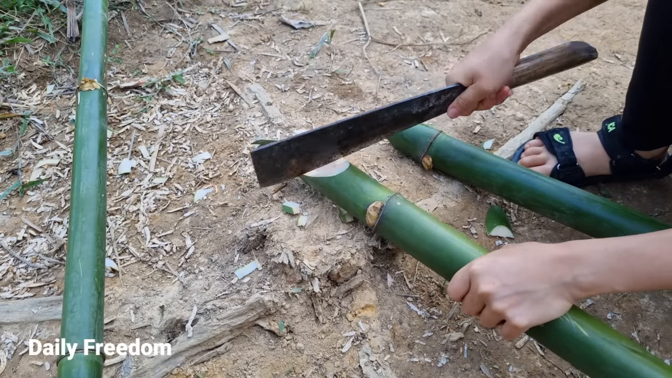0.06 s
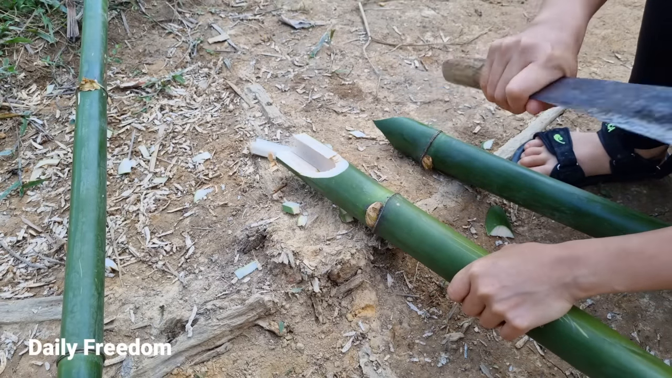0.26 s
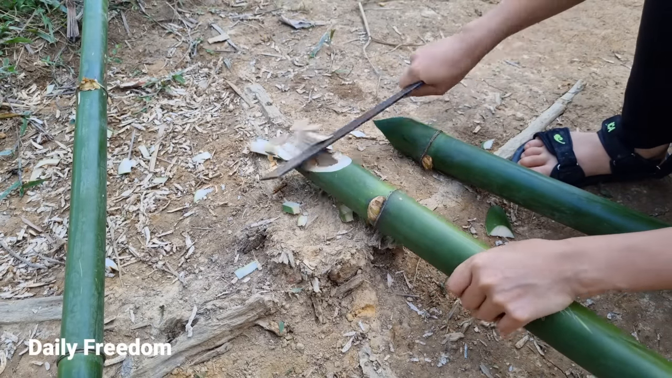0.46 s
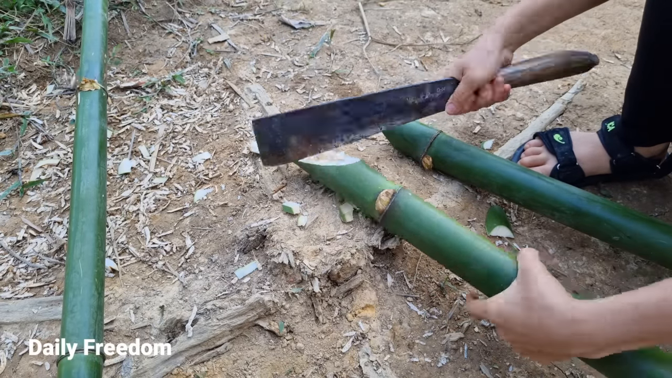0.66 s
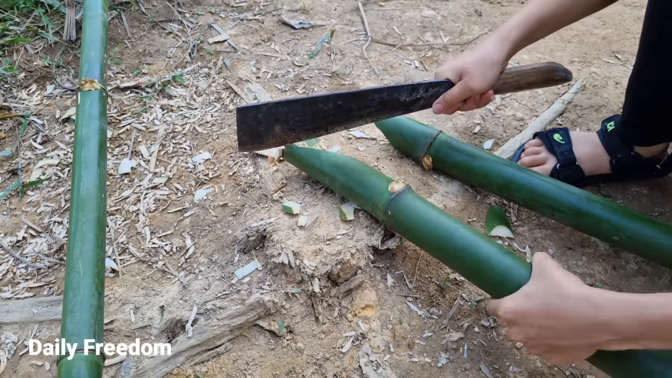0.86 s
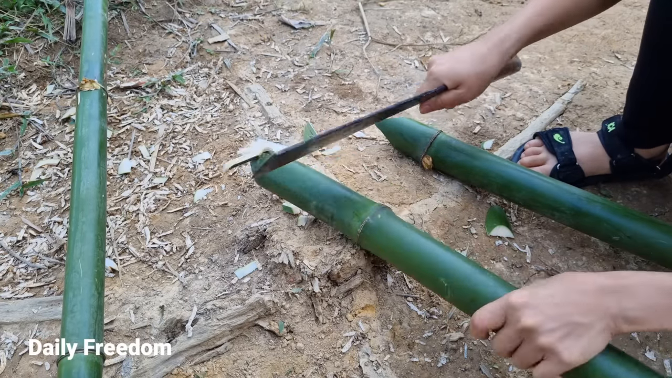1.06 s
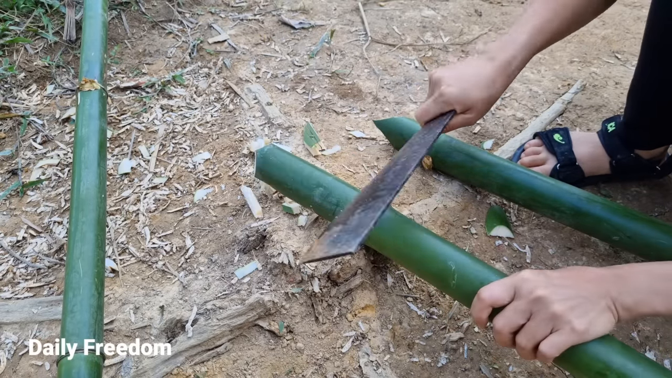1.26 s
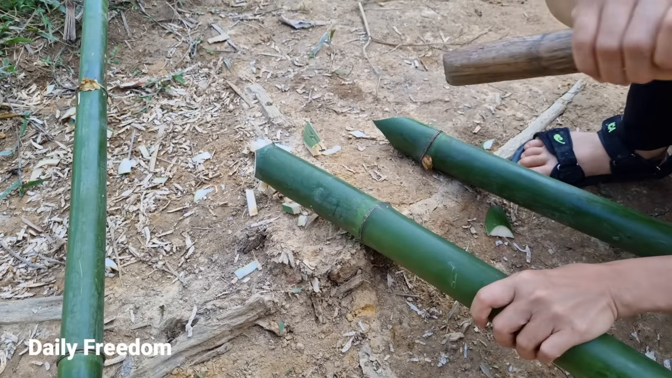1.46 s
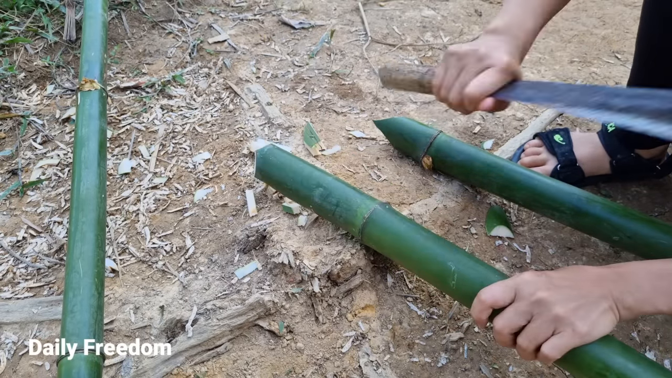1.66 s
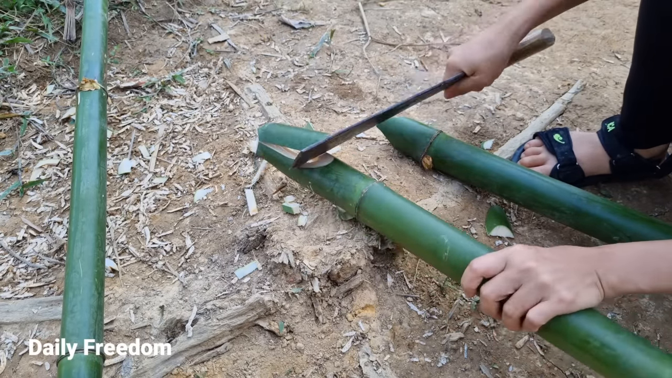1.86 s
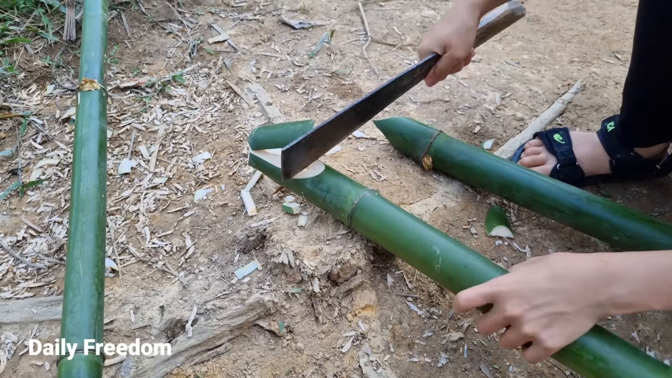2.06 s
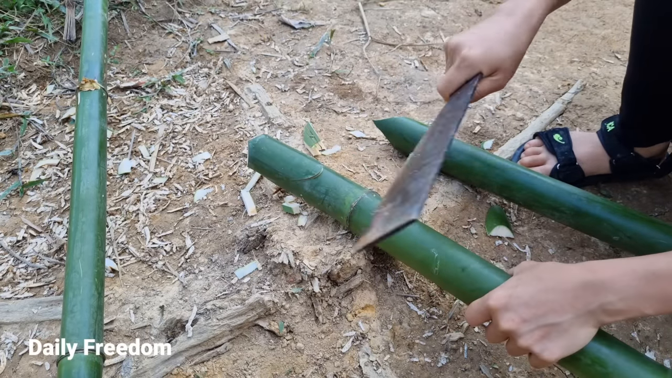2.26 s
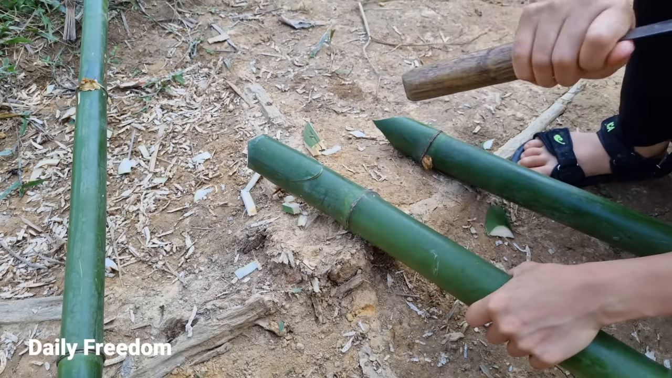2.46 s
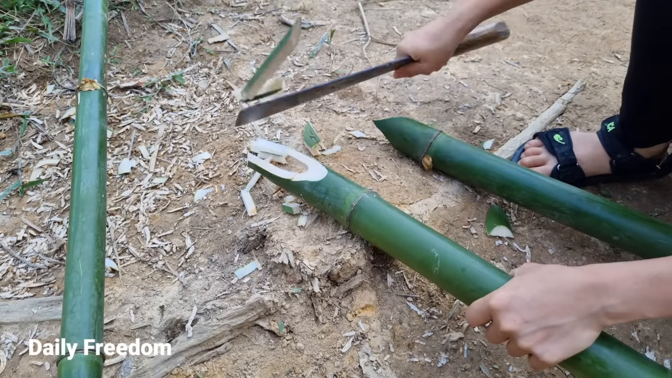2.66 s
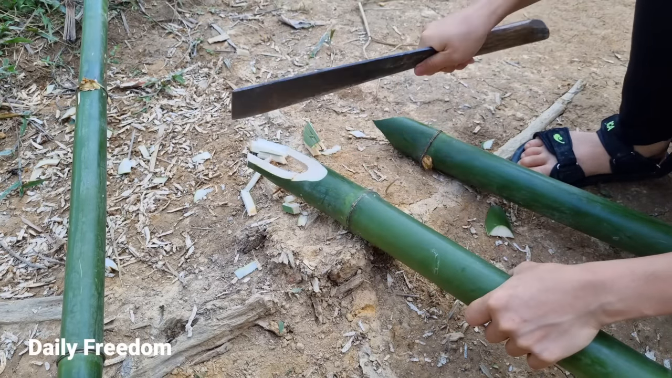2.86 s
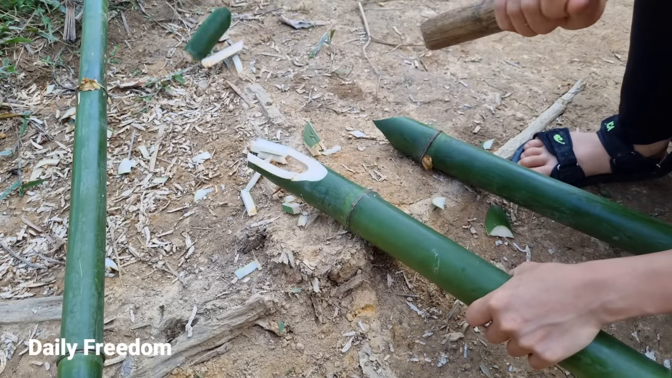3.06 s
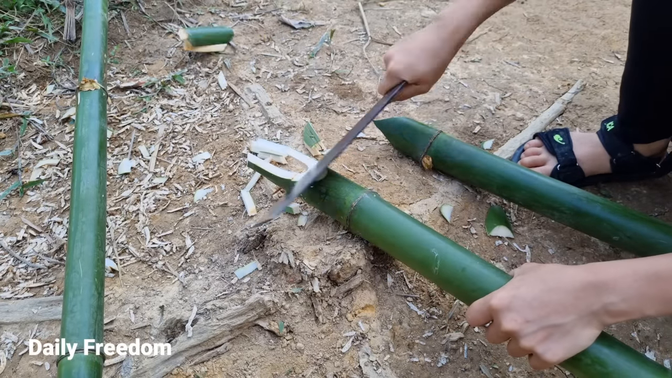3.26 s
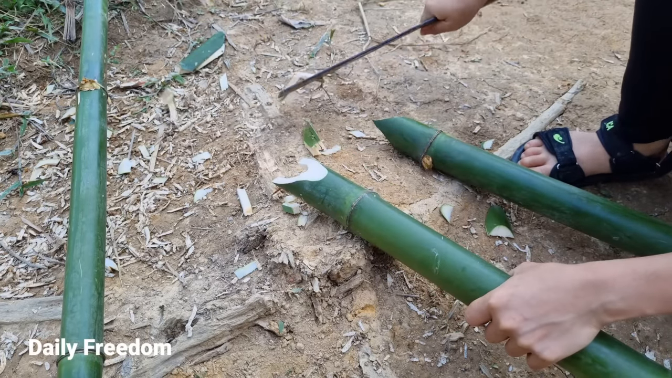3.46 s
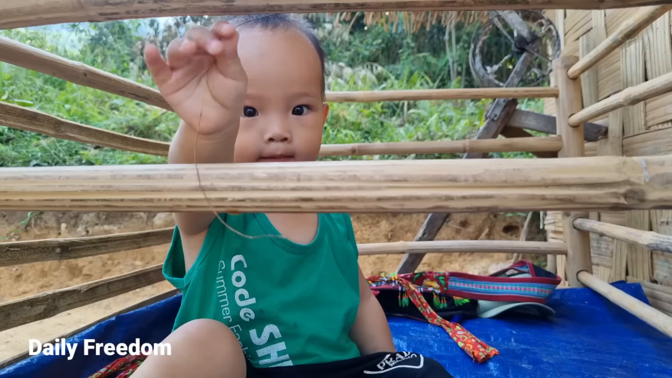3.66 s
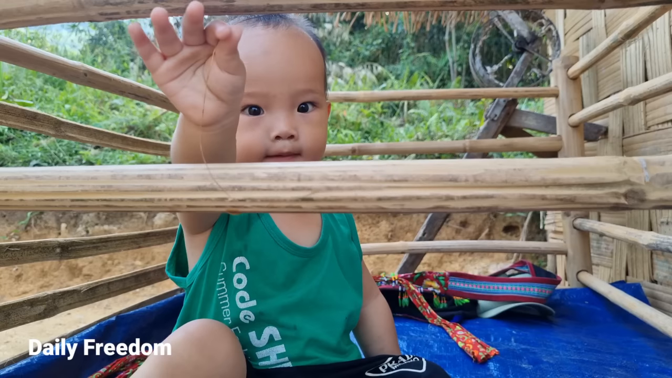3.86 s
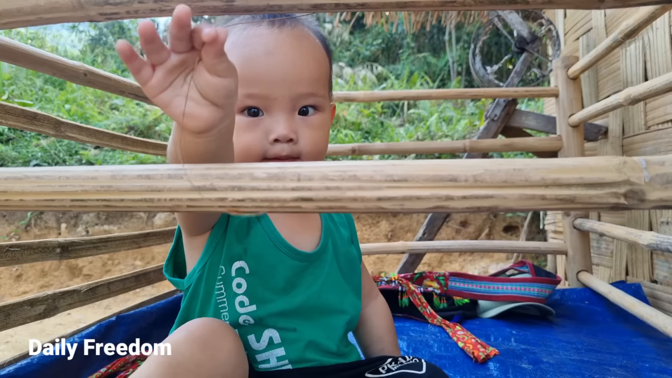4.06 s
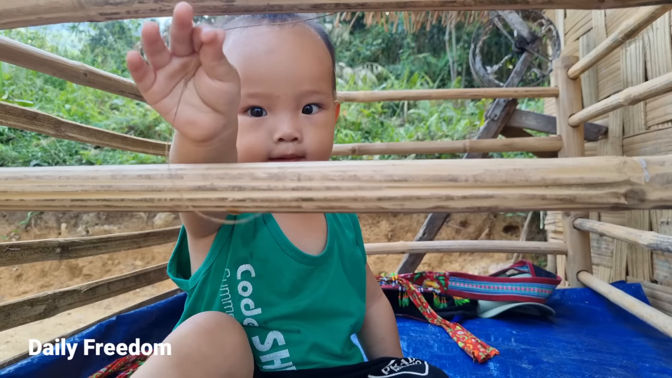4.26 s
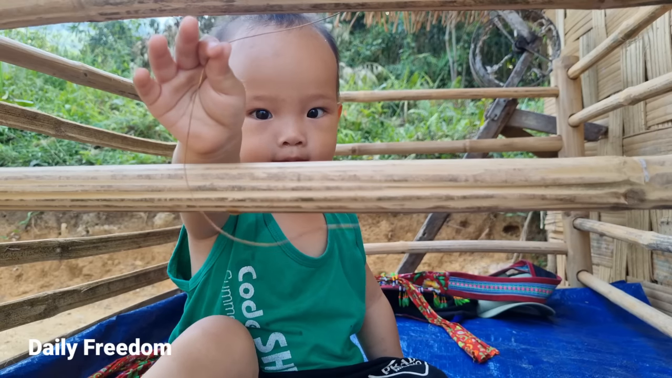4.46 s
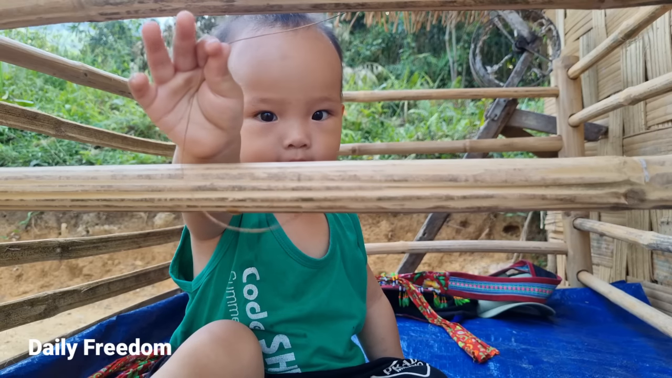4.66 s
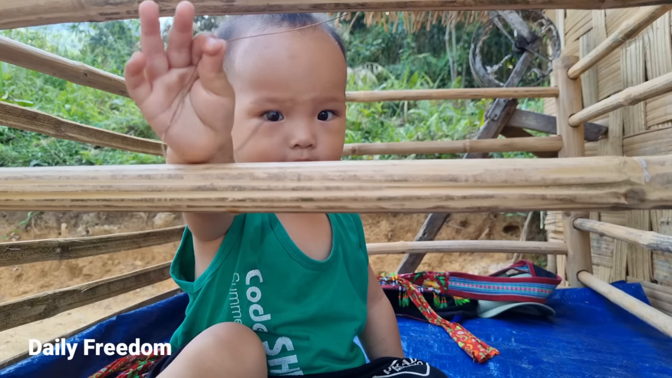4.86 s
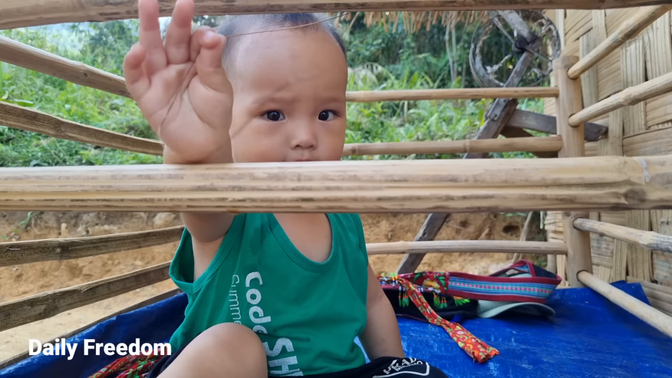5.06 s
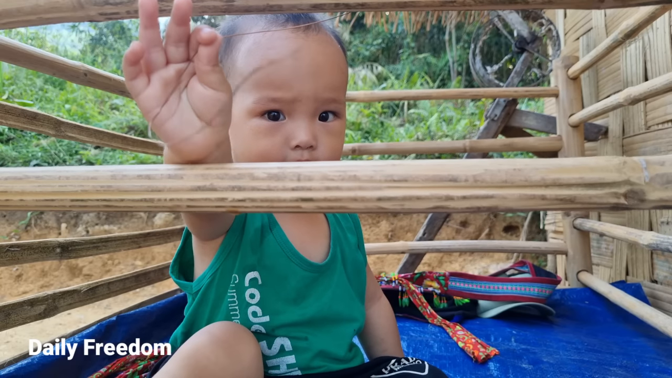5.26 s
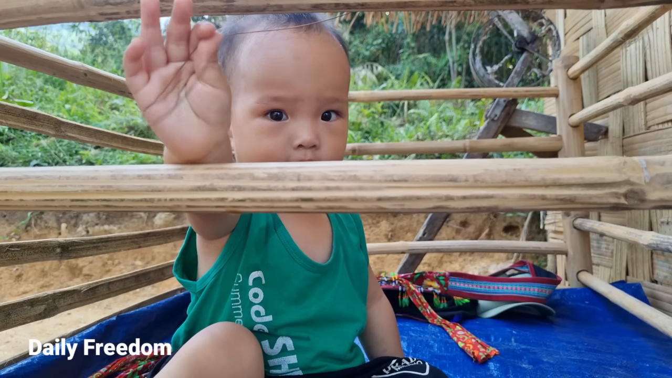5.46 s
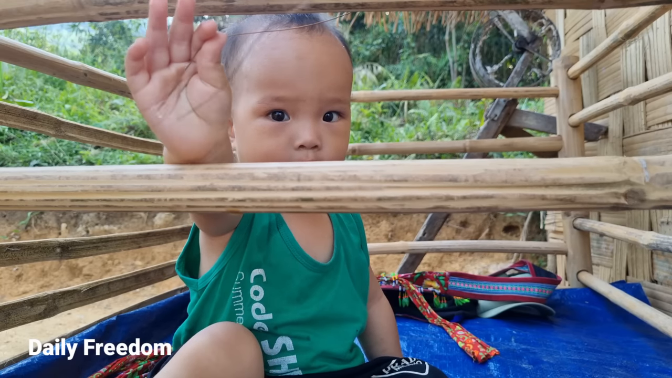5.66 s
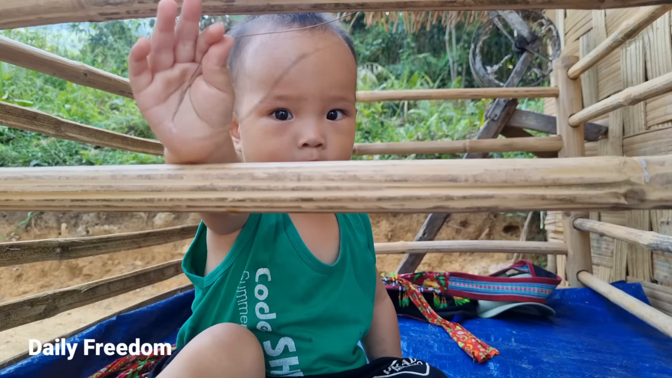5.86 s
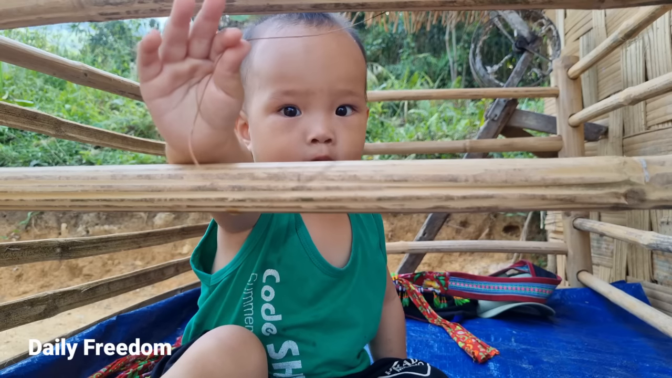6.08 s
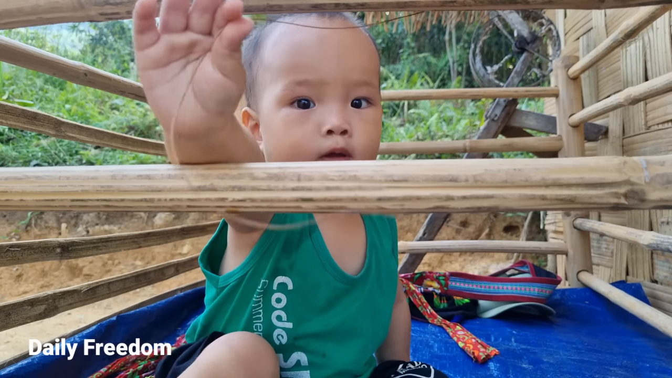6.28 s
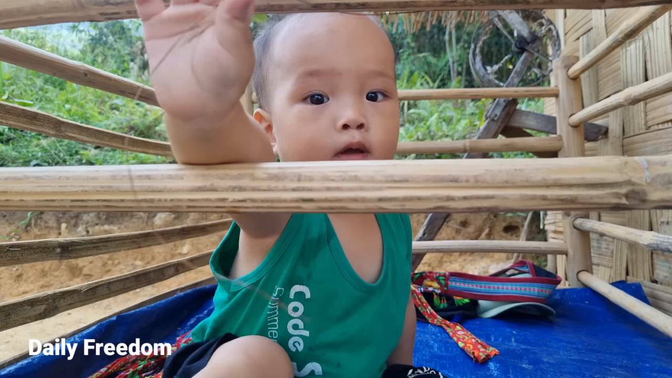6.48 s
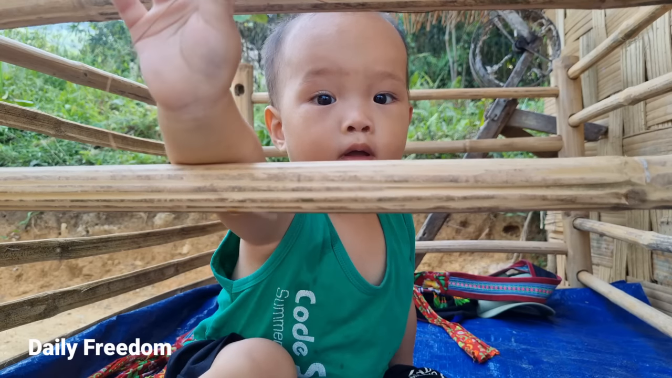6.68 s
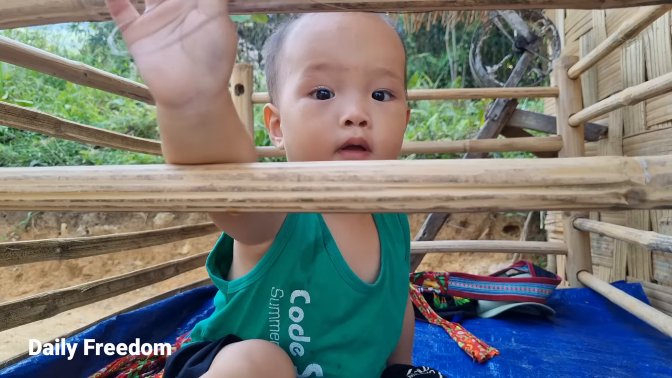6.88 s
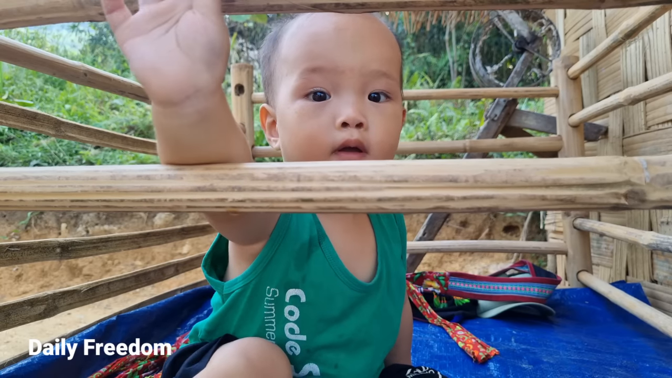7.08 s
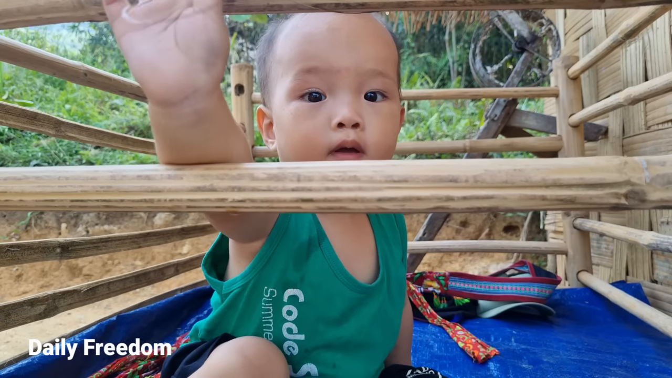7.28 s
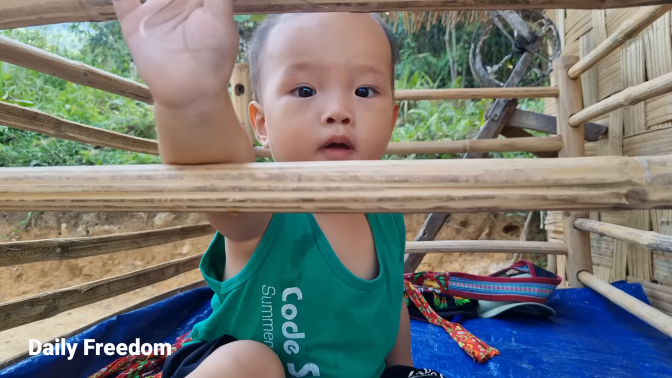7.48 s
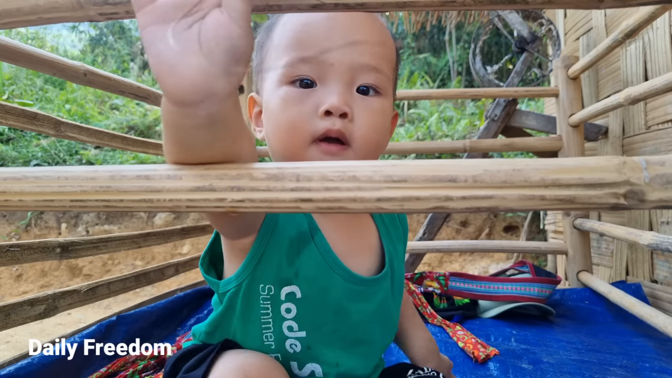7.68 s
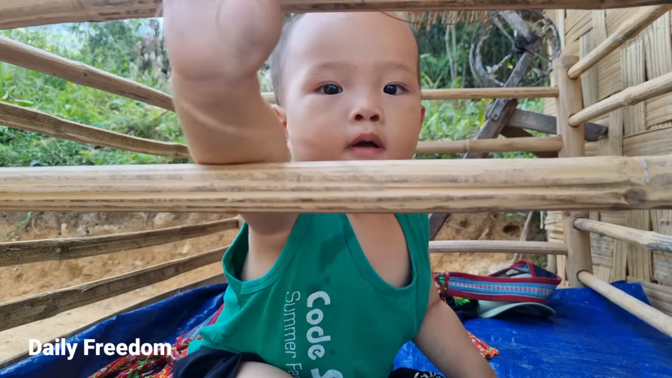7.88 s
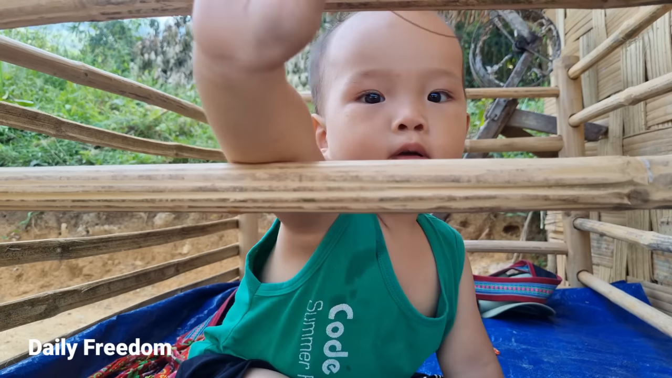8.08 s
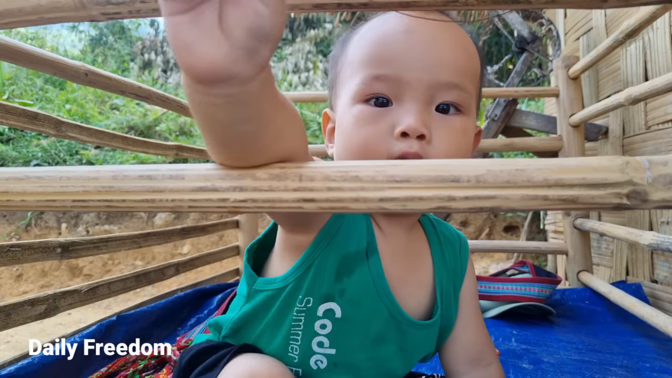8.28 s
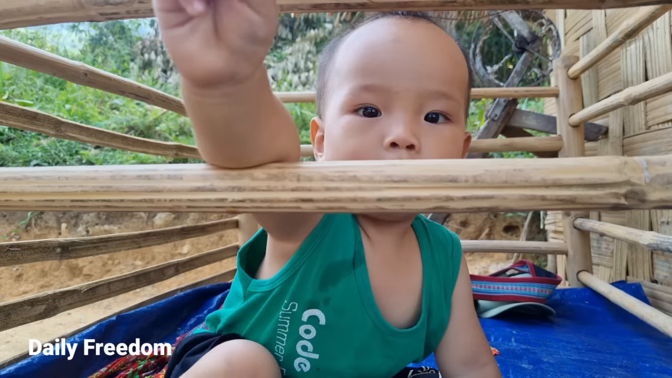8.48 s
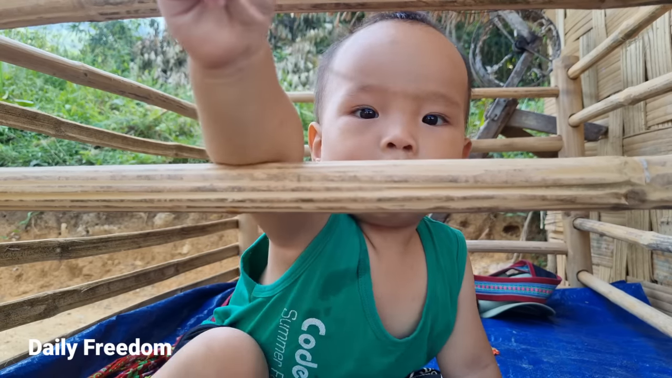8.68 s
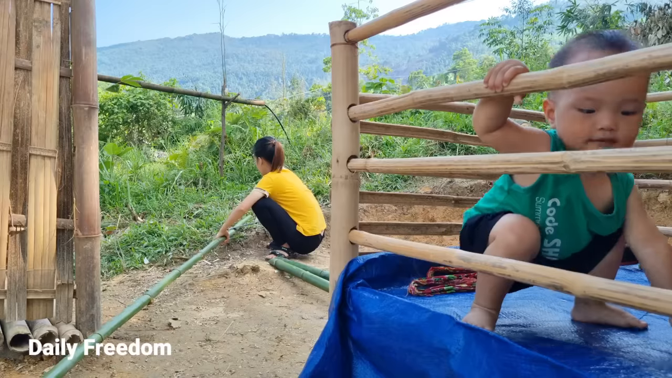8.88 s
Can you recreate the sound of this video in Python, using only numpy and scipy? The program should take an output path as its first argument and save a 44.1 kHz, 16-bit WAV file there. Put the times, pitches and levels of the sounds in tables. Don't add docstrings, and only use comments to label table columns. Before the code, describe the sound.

Close, woody chops split bamboo outdoors; chips patter, poles knock and snap, one drops loudly, with crickets, cicadas and a faint far engine behind.

```python
import sys
import numpy as np
from scipy import signal
from scipy.fft import rfft, irfft, next_fast_len
from scipy.io import wavfile
from scipy.ndimage import uniform_filter1d

SR = 44100
rng = np.random.default_rng(int(sys.argv[2]) if len(sys.argv) > 2 else 0)


def wav_out(sig):
    wavfile.write(sys.argv[1], SR, np.round(np.clip(np.atleast_2d(sig).T, -1, 1) * 32767).astype(np.int16))


def to_linear_factor(level_db):
    exponent = np.asarray(level_db, float) / 20
    return 10 ** exponent


N = 393813

# pitch_hz, level_db_per_hz
FIELD_SPECTRUM = [(90, -5), (200, -6.5), (500, -7), (1000, -30.5), (1650, -5), (2300, -10.5), (4200, -3),
                  (6600, -5.5), (7900, -3), (9500, -8), (11500, -9.5), (13000, -32), (15700, 2),
                  (16300, -35.5)]
WIND_SPECTRUM = [(13, -32.5), (25, -20), (38, 0), (70, 10.5), (176, -16.5), (237, -5), (361, -44),
                 (500, -11), (650, -35), (1100, -120)]
LITTER_SPECTRUM = [(150, -23), (250, -10), (439, -6), (535, 1.5), (1070, -2.5), (2330, -1), (3140, -1.5),
                   (7920, -2), (8740, -6.5), (13000, -6.5)]
CICADA_SPECTRUM = [(11500, -72), (12600, -6), (13800, 2.5), (14600, 8.5), (15500, 5.5), (15800, -44),
                   (16500, -72)]
FIELD_DB = -54.5
# time_s, level_db
WIND_LEVEL = [(.3, -69.5), (1.6, -63.5), (4.2, -56.5), (5.3, -66.5), (5.9, -59.5), (7.5, -58.5), (7.8, -48),
              (8.3, -61), (8.55, -44.5), (8.93, -59.5)]
CRICKET_LEVEL = [(.74, -66), (.8, -56), (1.15, -56.5), (1.24, -65), (1.66, -67), (1.74, -56.5),
                 (2.65, -56.5), (3.75, -61), (3.9, -63), (8.2, -61.5), (8.55, -70)]
CICADA_LEVEL = [(2.2, -55), (3.9, -52), (8.36, -51.5), (8.43, -50), (8.7, -57)]
# time_s, change_db
HUSH = [
    (8.4, -1),
    (8.5, -11),
    (8.93, -7),
]
# start_s, level_db, length_s
STIRS = [(0, -52.5, 0.067), (0.564, -55, 0.17), (1.426, -63, 0.52), (2.21, -52.5, 0.073),
         (3.824, -52, 0.066), (3.954, -64.5, 0.28), (6.242, -57, 0.21), (6.951, -54.5, 0.22),
         (7.717, -51.5, 0.25), (7.947, -58.5, 0.39), (8.6, -63, 0.35)]
STIR_RISE_S, STIR_FALL_DB_PER_S, STILL_DB = 0.053, 87.5, -62.5
# pitch_hz, likeness_0_to_1 (below 0 counts as 0)
AIR_LIKENESS = [(60, 0.8), (180, 0.8), (550, 0.26), (1650, -0.34), (4970, 0.21), (15000, 0)]
HIT_LIKENESS = [(100, 0.97), (300, 0.92), (560, 0.84), (900, 0.45), (1600, 0.43), (3000, 0.15),
                (12000, 0.15)]

# time_s, firing_rate_hz, level_db
ENGINE = [
    (1.6, 81.1, -65.5),
    (2.0, 81.9, -61),
    (3.45, 82.2, -67.5),
    (3.749, 47.8, -72),
    (5.852, 50.1, -68),
    (6.15, 75.8, -59),
    (7.3, 79.7, -58),
    (8.299, 67.54, -60),
    (8.93, 70.3, -62),
]
# multiple_of_firing_rate, level_db
ENGINE_ORDERS = [(2 / 3, -8), (1, 0), (2, -13)]

# start_s, peak_db, pitch_hz, left_minus_right_db
TAPS = [(0.133, -41, 1205, -1), (0.17, -31.5, 1800, -4), (0.225, -39, 1920, -4), (0.37, -28, 3690, 6),
        (.925, -40.5, 1820, 6), (1.333, -50, 910, 10), (1.469, -41, 4700, 3), (1.516, -39.5, 3980, 9),
        (1.61, -42, 1730, 8), (1.94, -38, 5070, 5), (4.941, -29.5, 3300, 3), (4.95, -38, 1480, 5),
        (8.736, -37.5, 4000, 1), (1.387, -43.5, 574, 3), (4.562, -48, 606, 6), (2.096, -43, 3400, 18),
        (2.971, -38, 1500, 6), (3.169, -28, 1450, 3), (8.797, -37, 2380, 3)]
TAP_CRACK_DB, TAP_T60_S = -23, 0.041
# start_s, peak_db, pitch_hz, t60_s
LANDINGS = [(0.083, -35, 2400, 0.15), (0.366, -33, 1410, 0.11), (0.652, -38.5, 2100, 0.11),
            (.68, -39.5, 910, .06), (1.424, -44.5, 616, 0.081), (5.003, -38.5, 517, 0.023),
            (6.31, -43, 1650, .04), (8.47, -29, 527, 0.11), (8.529, -35.5, 450, .1),
            (8.563, -38.5, 695, 0.11), (3.6, -53.5, 690, 0.15), (8.631, -39, 2400, 0.1),
            (8.846, -38, 2460, 0.12), (0.758, -37.5, 2590, 0.075), (1.152, -39, 1550, 0.065),
            (1.153, -40.5, 790, 0.13), (1.928, -38.5, 800, 0.0095), (2.814, -31.5, 560, 0.035),
            (3.153, -28.5, 950, 0.026), (3.167, -27.5, 685, 0.019), (3.57, -40, 1100, 0.066),
            (3.971, -44, 660, 0.057), (5.336, -42.5, 211, 0.076), (7.99, -30.5, 256, 0.081),
            (5.347, -45, 1500, 0.035), (5.662, -51, 910, .05), (6.399, -47, 900, 0.028)]
LANDING_CRACK_DB, LANDING_PAN_DB = -1.5, 0
# start_s, crack_db, pitch_hz, left_minus_right_db
TWIGS = [(0.116, -38, 1900, -8), (3.502, -35, 1690, 1), (4.154, -33.5, 550, 2), (4.927, -37, 261, 1),
         (5.04, -20.5, 1490, -2.5), (5.969, -22, 1520, -7), (2.728, -31, 6500, -4), (6.43, -36, 1600, -11),
         (7.366, -37, 2000, 1), (7.545, -38, 268, 7), (7.979, -31, 226, -14)]
TWIG_TONE_DB, TWIG_T60_S = -17, 0.024
# start_s, level_db, pitch_hz, length_s
CLUCKS = [(0.154, -46, 298, 0.014), (2.013, -60.5, 421, 0.08), (3.684, -54.5, 367, 0.036),
          (3.775, -57, 1760, 0.041), (4.065, -63, 1820, 0.039), (4.276, -62, 1705, 0.042),
          (3.883, -59, 552, 0.059), (4.062, -62, 532, 0.1), (4.542, -57.5, 1790, 0.038),
          (4.724, -60, 1740, 0.05), (4.724, -63, 1530, .055), (4.639, -62.5, 412, 0.083),
          (4.975, -57.5, 570, 0.032), (0.934, -65, 1796, 0.13), (.94, -61, 482, 0.1),
          (1.07, -64, 450, 0.064), (5.69, -65, 800, .06), (5.69, -61, 380, .045), (6.015, -62, 1770, .045),
          (6.015, -63, 1570, .23), (6.13, -60, 1800, 0.055), (6.239, -59.5, 1730, .05),
          (6.61, -65, 545, 0.047), (6.71, -65, 543, 0.027), (6.692, -65, 860, 0.032),
          (6.694, -61, 2150, .04), (6.695, -63.5, 1630, .075), (7.7, -55, 1600, 0.066),
          (7.79, -59, 1600, .17)]

# start_s, peak_db, crack_db, rise_s, t60_s
BLOWS = [
    [(.5272, -7, -9, 0.00057, 0.07), (.531, -11.5, -5.5, 0.0023, 0.03), (.539, -16, -31, 0.0014, 0.078),
     (.556, -35, -26.5, .004, 0.22)],
    [(1.794, -5, -1.5, 0.00037, 0.025), (1.7985, -7, -12, 0.00086, 0.052),
     (1.807, -12.5, -15.5, 0.0017, 0.081), (1.829, -24, -22, 0.0031, 0.12)],
    [(2.6752, -3, -6.5, 0.00043, 0.018), (2.682, -9, -6, 0.0013, 0.034),
     (2.688, -11, -11.5, 0.00087, 0.055)],
    [(3.352, -10.5, -4, 0.0022, 0.047), (3.364, -13, -14, 0.0046, 0.044), (3.376, -21, -12.5, 0.005, 0.043),
     (3.386, -17, -14.5, 0.0036, 0.036), (3.430, -33.5, -35, 0.0023, 0.11)],
]
# start_s, peak_db, crack_db, t60_s
KNOCKS = [
    [(5.757, -12, -36, 0.067), (5.762, -15.5, -28, 0.093), (5.769, -20, -29, 0.19)],
    [(7.008, -30, -25, 0.079), (7.018, -20.5, -18, 0.12), (7.0695, -11, -4, 0.077),
     (7.075, -17, -10, 0.068), (7.143, -25, -20, 0.089), (7.149, -33, -14.5, 0.086)],
    [(8.407, -28, -18, 0.04), (8.412, -3, -12, 0.097), (8.424, -10, -13.5, 0.16), (8.482, -36, -21, 0.16),
     (8.45, -37, -23, 0.22), (8.513, -24.5, -21.5, 0.17), (8.558, -34, -28, 0.095),
     (8.625, -39.5, -57, 0.68)],
]
KNOCK_RISE_S = 0.00056
SOFT_SHARE = 0.25
# pitch_hz, level_db_per_hz
POLE_WALLS = [
    [(250, -17), (572, -17.5), (833, 1.5), (1100, -19), (1810, -2.5), (5000, -15)],
    [(250, -24), (699, -9), (865, 2.5), (1260, -4), (2300, -2), (5000, -11)],
    [(250, -31.5), (720, -12.5), (900, 5.5), (1240, -10), (2390, -7.5), (5000, -13)],
    [(250, -8), (342, -39), (720, -9), (1230, -5), (1930, -5), (5000, -20.5)],
    [(250, -21), (408, -1), (565, -9), (772, 0), (1560, -6), (5000, -23.5)],
    [(250, -50), (632, -19), (1080, -5), (1340, -6.5), (2480, -1.5), (5000, -7.5)],
    [(250, -17), (413, -16), (1080, 3.5), (2000, -5), (2800, -2), (3300, -10.5), (4700, -8)],
]
# pitch_hz, level_db_per_hz
LOW_SKIRT = [(150, -33.5)]
HIGH_SKIRT = [(6500, -30.5), (11000, -120)]
# pitch_hz, height_db_per_hz, t60_s
POLE_MODES = [
    [(837, -3, 0.086), (1640, -3, 0.067), (1820, 0, 0.058), (2350, 0, .04), (2708, -20, 0.067),
     (4100, -6, 0.064)],
    [(870, -4, 0.029), (1600, -1, 0.11), (1920, 6.5, 0.039), (2350, 6, 0.09), (3450, -9, .06),
     (4650, -7, 0.055)],
    [(920, -7, 0.03), (1514, -4.5, 0.049), (1810, -8.5, .06), (1900, -20, 0.051), (2420, -6, 0.05),
     (5050, -16.5, .06)],
    [(532, -2.5, 0.059), (823, -4, 0.04), (1560, 0.5, 0.061), (1940, 4, 0.042), (2290, -3, .07),
     (4460, -14, 0.038)],
    [(391.4, 4, 0.22), (748, -7, 0.26), (1308, -12, 0.18), (1550, -3.5, 0.072), (2315, -13, 0.08),
     (2783, -9, 0.067)],
    [(1642, 6, 0.093), (2616, 8, 0.029), (2920, 1, 0.046)],
    [(942, 8.5, 0.17), (1071, 7, 0.18), (1578, 8, 0.076), (2150, -10, 0.11), (2390, 2.5, 0.057),
     (2720, 2, 0.095), (4500, -6, 0.14)],
]
# left_lag_ms, left_minus_right_db, full_blow_thud_db
POLE_PLACES = [(-0.18, 0.5, -28), (-0.224, -1, -29.5), (0.37, -0.5, -22.5), (-0.19, 0.5, -28),
               (-0.45, 1.5, -21.5), (0.31, 1.5, -33.5), (-0.45, 2, -19)]
# start_s,
# peak_db, pitch_hz, t60_s
PINGS = [
    [(.371, -23, 3750, .012), (.529, -16, 4100, 0.022), (.536, -21, 2300, 0.033)],
    [(1.7945, -9.5, 4500, 0.016), (1.807, -15, 870, 0.034), (1.840, -31, 1820, .06),
     (1.801, -19, 3450, 0.032), (1.832, -28, 2400, 0.042), (1.85, -38.5, 870, 0.051)],
    [(2.6755, -13.5, 2450, 0.027), (2.683, -14.5, 1600, 0.022), (2.689, -16, 1480, .03),
     (2.6815, -12.5, 870, 0.033), (2.687, -12.5, 880, 0.033)],
    [(3.355, -17.5, 4240, 0.019), (3.357, -14, 1560, 0.046), (3.364, -21, 1970, 0.027),
     (3.376, -24, 860, 0.038), (3.384, -21, 867, 0.038)],
    [(5.757, -27, 2315, 0.033), (5.758, -22, 1600, 0.046), (5.758, -25, 900, .03), (5.759, -31, 3050, .04),
     (5.778, -35, 2790, .07), (5.788, -30, 668, .08), (5.832, -39, 613, 0.052)],
    [(7.070, -19, 2890, 0.027)],
    [(8.4125, -5.5, 2667, 0.031), (8.413, -16, 2150, 0.04), (8.414, -18, 1220, 0.059),
     (8.413, -18, 4760, .03), (8.424, -15, 2230, 0.036), (8.424, -22, 4640, 0.027), (8.424, -26, 1230, .05),
     (8.44, -21, 930, .05), (8.513, -31, 1066, .06)],
]
# pitch_hz, level_db_per_hz
FIBRE_SPECTRUM = [(1470, -44), (2500, -5.5), (3710, -4.5), (4520, -1.5), (5820, -5.5), (8040, 2),
                  (9050, -7.5), (9950, -5), (14500, -13), (16000, -9), (16500, -25)]
THUD_SHARE = 0.92
SHADE_DB = -2

# start_s, peak_db, pitch_hz
THUMPS = [(0.531, -33, 270), (2.679, -30, 196), (1.168, -40, 118), (2.815, -38.5, 261), (3.168, -38.5, 249),
          (4.116, -46.5, 218), (4.34, -48, 246), (4.785, -49, 250), (3.438, -40, 200), (4.946, -41, 235),
          (5.336, -44.5, 219), (5.766, -24, 300), (5.8, -32, 215), (7.732, -37.5, 200), (7.765, -44, 142.7),
          (7.98, -31.5, 238), (7.994, -27.5, 258), (8.016, -29, 65.4), (8.458, -16, 161),
          (8.491, -24.5, 77.5), (8.523, -27, 290), (8.628, -35.5, 117), (8.872, -46, 346)]
THUMP_T60_S, THUMP_SWINGS = 0.015, 2.6
# start_s, peak_db, left_minus_right_db, length_s
BRUSHES = [(1.599, -38, 6.5, .03), (7.913, -37.5, -12, .04), (8.112, -36, -8, .008),
           (8.123, -31, -11, 0.032), (8.18, -36, -13, .03), (8.312, -43, -6, .02)]
# pitch_hz, level_db_per_hz
MATTING_SPECTRUM = [(2500, -32), (5500, -14), (7600, 1.5), (8800, -9), (10000, -3), (11500, -13),
                    (14000, -18), (15600, -36)]


def evened(x):
    return x / np.sqrt(np.mean(x ** 2) + 1e-20)


def peaked(x):
    return x / (abs(x).max() + 1e-12)


def read(points, hz):
    f, value = np.transpose(points)
    return np.interp(np.log(hz + 1), np.log(f + 1), value)


def over_time(points, t):
    return np.interp(t, *np.transpose(points))


def seconds(length):
    return np.arange(round(length * SR)) / SR


def add(mix, s, sound):
    part = mix[:, round(s * SR):][:, :sound.shape[1]]
    part += sound[:, :part.shape[1]]


def causal(points):
    hz = abs(np.fft.fftfreq(4096, 1 / SR))
    log_gain = np.log(to_linear_factor(np.maximum(read(points, hz), -70)))
    return np.fft.ifft(np.exp(np.conj(signal.hilbert(log_gain)))).real[:1024]


def through(drive, response):
    return signal.fftconvolve(drive, response[None], axes=1)[:, :drive.shape[1]]


def ports(pair, likeness, lag_ms=0., pan_db=0.):
    size = next_fast_len(pair.shape[1])
    hz = np.fft.rfftfreq(size, 1 / SR)
    left, other = rfft(pair, size)
    share = np.clip(read(likeness, hz), 0, 1)
    lag_s = lag_ms / 1000 * hz ** 2 / (hz ** 2 + 450 ** 2)
    right = share * left * np.exp(2j * np.pi * hz * lag_s) + np.sqrt(1 - share ** 2) * other
    pan = to_linear_factor(np.array([[pan_db], [-pan_db]]) / 2)
    return irfft(np.array([left, right]), size)[:, :pair.shape[1]] * pan


def noise(spectrum, patchy_db):
    frames, hz = N // 256 + 5, np.fft.rfftfreq(1024, 1 / SR)
    a, b, patches = rng.standard_normal((frames, 513, 5)).T[[[0, 1], [2, 3], [4, 4]]]
    patches = evened(uniform_filter1d(uniform_filter1d(patches[0], 12, 0), 12, 1))
    patches = patches / (1 + (hz[:, None] / 6000) ** 2)
    z = (a + 1j * b) * to_linear_factor(read(spectrum, hz)[:, None] + patchy_db * patches)
    return evened(signal.istft(z, nperseg=1024, noverlap=768)[1][:, :N])


def crickets(t, hz=5600, width=290):
    drift = evened(uniform_filter1d(rng.standard_normal(N), 9000))
    scrape_turns = np.cumsum(88 * (1 + .04 * drift)) / SR
    scrape = np.maximum(np.sin(2 * np.pi * scrape_turns), 0) ** 1.5 + .3
    phase = np.where(t < 1.4, 7.2 * (t - .79), 6.8 * (t - 2.125)) % 1
    chirp = .2 + np.clip(phase / .1, 0, 1) * np.clip((.84 - phase) / .1, 0, 1)
    wander = evened(uniform_filter1d(rng.standard_normal((2, N)), 200, axis=1))
    tone = np.sin(2 * np.pi * np.cumsum(hz + 110 * wander, axis=1) / SR)
    wing = tone + 1.9 * rng.standard_normal((2, N))
    band = signal.butter(2, [hz - width, hz + width], "bandpass", fs=SR, output="sos")
    return evened(signal.sosfilt(band, wing * scrape * chirp))


def cicadas(t):
    throb = 1 + 0.18 * np.sin(2 * np.pi * 40.3 * t) + .1 * np.sin(2 * np.pi * 73.0 * t)
    return throb * noise(CICADA_SPECTRUM, patchy_db=1.5)


def litter():
    struck = rng.random((2, N)) < 900 / SR
    strength = to_linear_factor(6 * np.minimum(rng.exponential(1, (2, N)), 4))
    ticks = struck * strength * rng.choice([-1, 1], (2, N))
    ticks = signal.oaconvolve(ticks, causal(LITTER_SPECTRUM)[None], axes=1)[:, :N]
    return evened(noise(LITTER_SPECTRUM, patchy_db=3.5) + .5 * evened(ticks))


def stirring(t):
    level = to_linear_factor(STILL_DB)
    for s, db, length in STIRS:
        swell = np.clip((t - s) / STIR_RISE_S + 1, 0, 1) ** 2
        level = level + swell * to_linear_factor(db - STIR_FALL_DB_PER_S * np.maximum(t - s - length, 0))
    return level


def air():
    t = np.arange(N) / SR
    insects = to_linear_factor(over_time(CRICKET_LEVEL, t)) * crickets(t) + to_linear_factor(over_time(CICADA_LEVEL, t)) * cicadas(t)
    wind = to_linear_factor(over_time(WIND_LEVEL, t)) * noise(WIND_SPECTRUM, patchy_db=2)
    field = to_linear_factor(FIELD_DB + over_time(HUSH, t)) * noise(FIELD_SPECTRUM, patchy_db=4.5)
    return ports(insects + wind + stirring(t) * litter() + field, AIR_LIKENESS)


def dropouts(x):
    hz, t, z = signal.stft(x, SR, nperseg=1024, noverlap=768)
    luck = rng.standard_normal((len(t) // 4 + 1, 205))
    luck = evened(uniform_filter1d(uniform_filter1d(luck, 2, 0), 2, 1))
    luck = luck.repeat(4, 0).repeat(3, 1)[:len(t), :len(hz)].T
    likely = np.interp(hz, [2300, 3300, 4100, 4700, 5700, 6400, 7700, 8800, 9800, 11500, 12800, 13500],
                       [-1, .4, .5, -.4, -1, .7, -.3, .5, 0, .8, .2, -2])
    lost = (luck + likely[:, None] > 1.1) | (hz > 15650)[:, None]
    return signal.istft(z * to_linear_factor(-45 * lost), SR, nperseg=1024, noverlap=768)[1][:, :N]


def engine(t):
    s, hz, db = np.transpose(ENGINE)
    turns = np.cumsum(np.interp(t, s, hz)) / SR
    waver = rng.standard_normal((len(ENGINE_ORDERS), N // 64 + 1))
    waver = evened(uniform_filter1d(waver, 90, axis=1)).repeat(64, axis=1)[:, :N]
    hum = np.zeros(N)
    for (multiple, order_db), w in zip(ENGINE_ORDERS, waver):
        hum += to_linear_factor(order_db + 2.0 * w) * np.sin(2 * np.pi * multiple * turns)
    return to_linear_factor(np.interp(t, s, db)) * hum


def cracks(t, rise, t60, snap=5, lumps_db=3.5, per_s=5000):
    shape = (2, len(t))
    u, e, g = rng.random(shape), rng.exponential(1, shape), rng.standard_normal(shape)
    clicks = (u < per_s / SR) * to_linear_factor(lumps_db * np.minimum(e, 4)) * np.sign(g)
    clicks = evened(clicks + 0.25 * g)
    since = t - .004
    swell = np.where(since < 0, 0, 1 - np.exp(-abs(since) / max(rise, 1e-4)))
    swell = swell + 0.1 * np.exp(np.minimum(since, 0) / 0.002)
    impact = 1 + 0.72 * np.exp(-abs(since) / 0.006)
    clumps = to_linear_factor(2.0 * evened(uniform_filter1d(rng.standard_normal(len(t)), 90)))
    tearing = clicks * swell * impact * clumps
    tearing[:, round((.004 + .5 * max(rise, 0)) * SR)] = -snap * np.exp(-max(rise, 0) / 0.00055)
    return tearing * to_linear_factor(-60 * np.maximum(since, 0) / max(t60, .005))


def rings(modes, t):
    return sum((-1) ** k * to_linear_factor(db - 60 * t / t60) * np.sin(2 * np.pi * hz * t)
               for k, (hz, db, t60) in enumerate(modes))


def debris():
    taps = [(s, db, hz, db + TAP_CRACK_DB, TAP_T60_S, pan_db) for s, db, hz, pan_db in TAPS]
    landings = [(s, db, hz, db + LANDING_CRACK_DB, t60, LANDING_PAN_DB) for s, db, hz, t60 in LANDINGS]
    twigs = [(s, db + TWIG_TONE_DB, hz, db, TWIG_T60_S, pan_db) for s, db, hz, pan_db in TWIGS]
    return taps + landings + twigs


def chip(s, db, hz, crack_db, t60, pan_db, fibre):
    t = seconds(.15)
    drive = cracks(t, .0018 + .25 * max(t60 - .065, 0), t60)
    wood = rings([(hz, 0, .006), (0.74 * hz, -3, .006), (1.12 * hz, -2, .005), (1.64 * hz, -4, .005),
                  (4.0 * hz, -8, .008), (0.56 * hz, -10, .012), (1250, -6, .004)], t[:1500])
    tap = to_linear_factor(db) * peaked(through(drive, wood))
    crackle = to_linear_factor(crack_db) * peaked(through(drive, fibre))
    return s - .003, ports(tap + crackle, HIT_LIKENESS, 0, pan_db)


def cluck(s, db, hz, length):
    t = seconds(length)
    waver = evened(uniform_filter1d(rng.standard_normal((2, 14000)), 200, axis=1))[:, :len(t)]
    tone = np.sin(2 * np.pi * np.cumsum(hz * (1 + 0.02 * waver[0])) / SR) * to_linear_factor(4.2 * waver[1])
    return s, to_linear_factor(db) * np.tile(tone * signal.windows.tukey(len(t), .8), (2, 1))


def ping(s, db, hz, t60, place):
    lag_ms, pan_db, _ = place
    delay = np.array([[max(lag_ms, 0)], [max(-lag_ms, 0)]]) / 1000
    t = np.maximum(seconds(.1) - delay, 0)
    level = to_linear_factor(db - 60 * t / max(t60, .005) + np.array([[pan_db], [-pan_db]]) / 2)
    return s, level * np.sin(2 * np.pi * hz * t) * (1 - np.exp(-t / 0.00038))


def hollow(wall, modes):
    t = seconds(.2)
    ring = sum(rings([mode], t) * 6 * np.log(10) / (SR * mode[2]) for mode in modes)
    return ring + np.pad(causal(LOW_SKIRT + wall + HIGH_SKIRT), (0, len(t) - 1024))


def blow(s, db, crack_db, rise, t60, place, pole, fibre):
    lag_ms, pan_db, thud_db = place
    t = seconds(.3)
    drive = cracks(t, rise, t60)
    body = to_linear_factor(db) * peaked(through(drive, pole))
    shade = np.array([[SHADE_DB], [-SHADE_DB]])
    sharp = to_linear_factor(crack_db + shade) * peaked(through(drive * to_linear_factor(-60 * t), fibre))
    low_band = signal.butter(2, [70, 330], "bandpass", fs=SR, output="sos")
    thud = signal.sosfilt(low_band, cracks(t, 0.0013, 3.1 * t60))
    thud = to_linear_factor(thud_db + THUD_SHARE * db) * peaked(thud)
    return s - .004, ports(body + sharp + thud, HIT_LIKENESS, lag_ms, pan_db)


def thump(s, db, hz):
    t = seconds(.3)
    t60 = THUMP_T60_S + THUMP_SWINGS / hz
    swing = -np.sin(2 * np.pi * hz * t * (1 - 0.41 * t)) * to_linear_factor(-60 * t / max(t60, .01))
    swing = swing * (1 - np.exp(-t * hz * 6))
    return s, to_linear_factor(db) * np.tile(peaked(swing), (2, 1))


def yard(x):
    t = seconds(.5)
    taps = (rng.random((2, len(t))) < 2000 / SR) * rng.choice([-1., 1.], (2, len(t))) * (t > .006)
    low = signal.sosfilt(signal.butter(2, 1500, fs=SR, output="sos"), taps)
    tail = low * to_linear_factor(-60 * t / 0.13) + 0.64 * (taps - low) * to_linear_factor(-60 * t / 0.14)
    return signal.oaconvolve(x, tail / np.linalg.norm(tail[0]), axes=1)[:, :N]


def brush(s, db, pan_db, length, matting):
    t = seconds(.1)
    swell = np.sin(np.pi * np.clip(t / max(length, .004), 0, 1) ** .7) ** 2
    stroke = cracks(t, .004, 1) * swell
    rustle = signal.fftconvolve(stroke, matting[None], axes=1)
    return s, ports(to_linear_factor(db) * peaked(rustle), HIT_LIKENESS, 0, pan_db)


def scene():
    background = dropouts(air())
    hum = engine(np.arange(N) / SR)
    hits = np.zeros((2, N))
    fibre, matting = causal(FIBRE_SPECTRUM), causal(MATTING_SPECTRUM)
    for row in debris():
        add(hits, *chip(*row, fibre))
    for row in CLUCKS:
        add(hits, *cluck(*row))
    knocks = [[(s, db, crack_db, KNOCK_RISE_S * to_linear_factor(-SOFT_SHARE * db), t60) for s, db, crack_db, t60 in rows]
              for rows in KNOCKS]
    for blows, wall, modes, place, pings in zip(BLOWS + knocks, POLE_WALLS, POLE_MODES, POLE_PLACES, PINGS):
        pole = hollow(wall, modes)
        for row in pings:
            add(hits, *ping(*row, place))
        for row in blows:
            add(hits, *blow(*row, place, pole, fibre))
    for row in THUMPS:
        add(hits, *thump(*row))
    for row in BRUSHES:
        add(hits, *brush(*row, matting))
    return hits + to_linear_factor(-16.0) * yard(hits) + background + hum


def low_pass(x):
    return signal.sosfilt(signal.butter(12, 16700, fs=SR, output="sos"), x)


def record(dry):
    cut = signal.sosfilt(signal.butter(4, 42, "highpass", fs=SR, output="sos"), dry)
    held = np.tanh(cut / 1.3) * 1.3
    top_cut = signal.firwin(255, 16200, window=("kaiser", 9), fs=SR)
    finished = signal.oaconvolve(held, top_cut[None], "same")
    return low_pass(finished)


dry = scene()
out = record(dry)
wav_out(out)
```